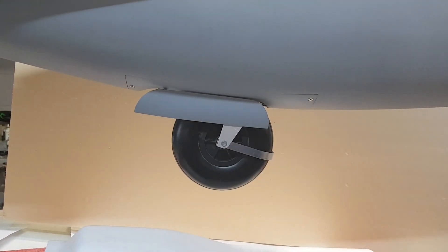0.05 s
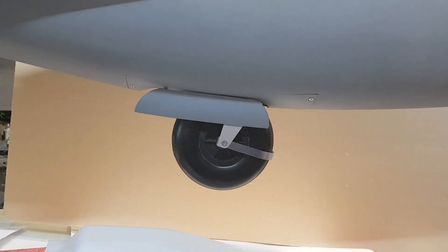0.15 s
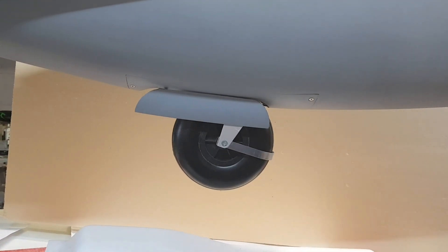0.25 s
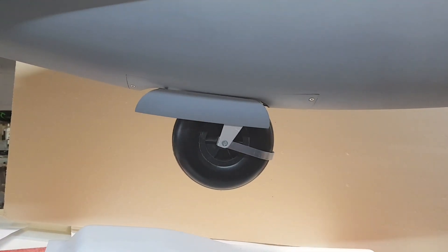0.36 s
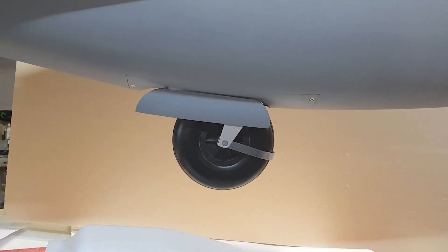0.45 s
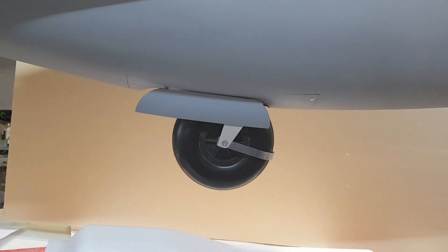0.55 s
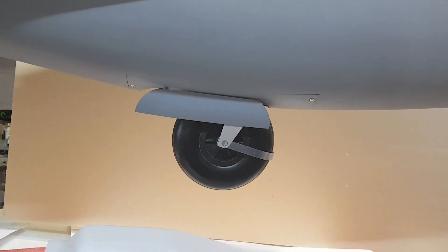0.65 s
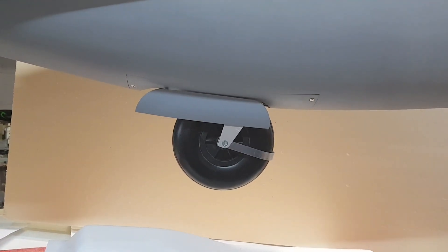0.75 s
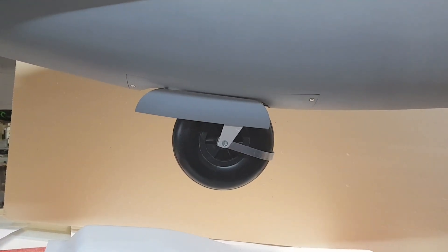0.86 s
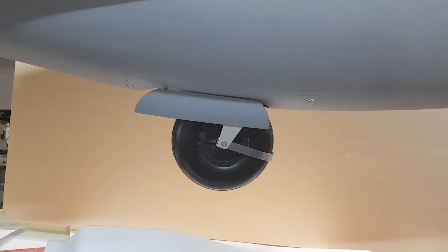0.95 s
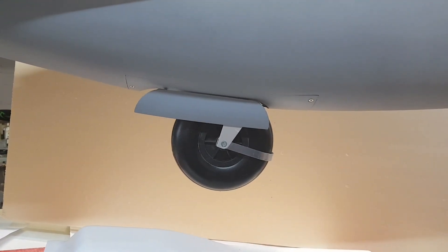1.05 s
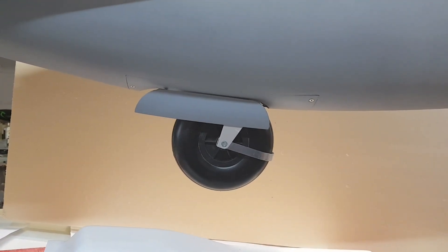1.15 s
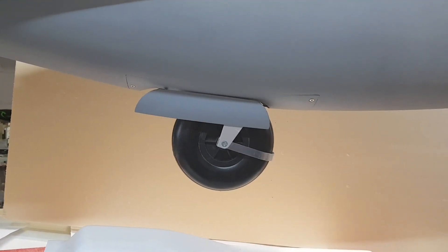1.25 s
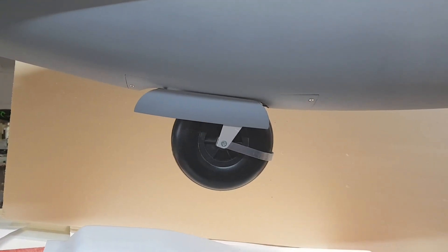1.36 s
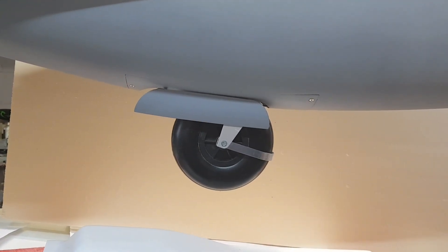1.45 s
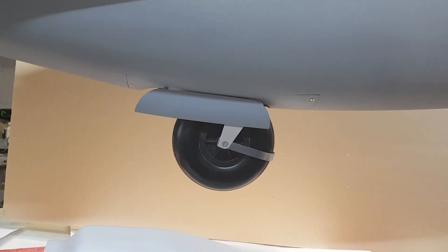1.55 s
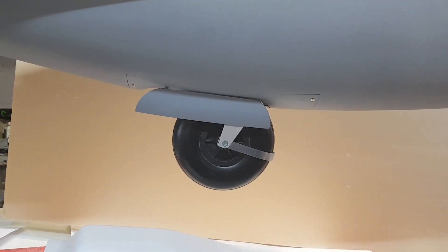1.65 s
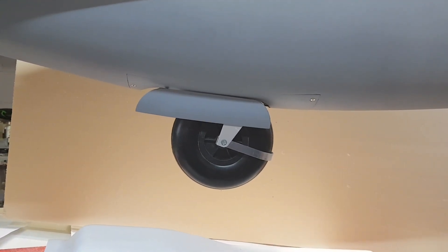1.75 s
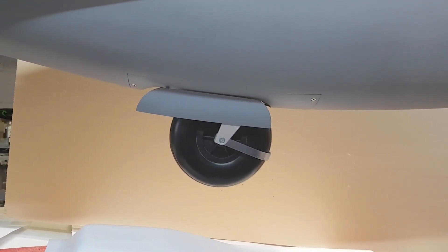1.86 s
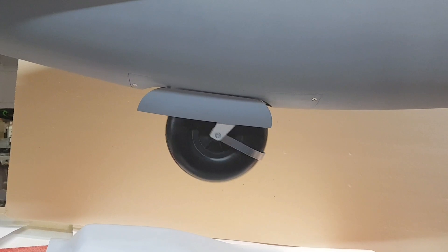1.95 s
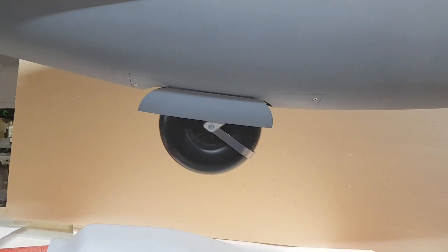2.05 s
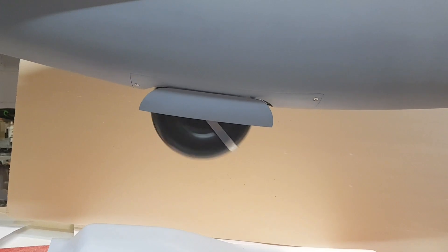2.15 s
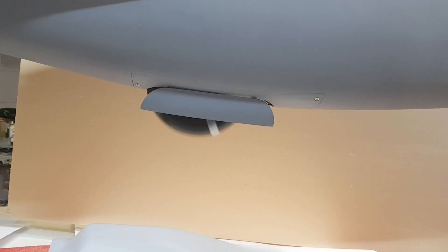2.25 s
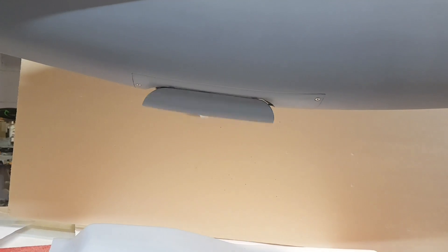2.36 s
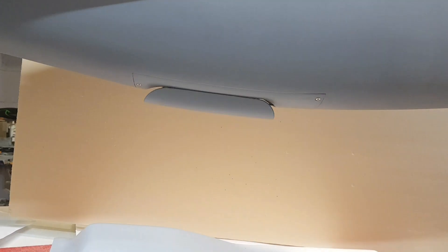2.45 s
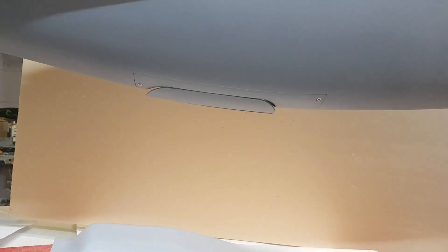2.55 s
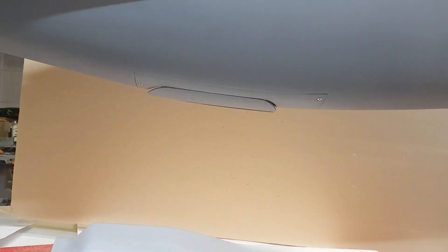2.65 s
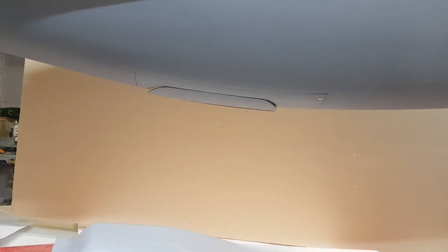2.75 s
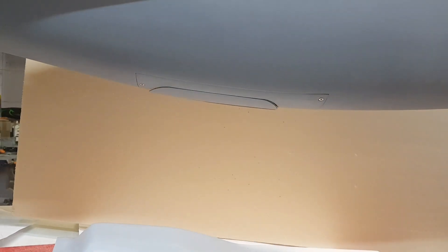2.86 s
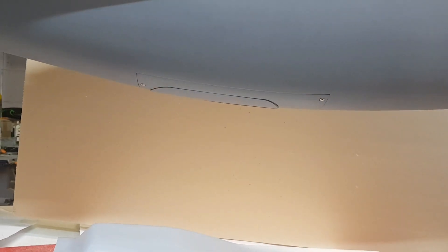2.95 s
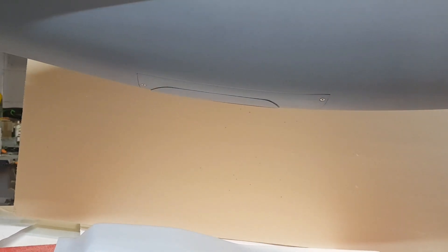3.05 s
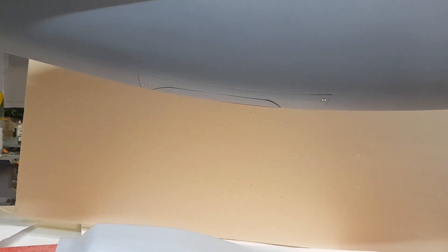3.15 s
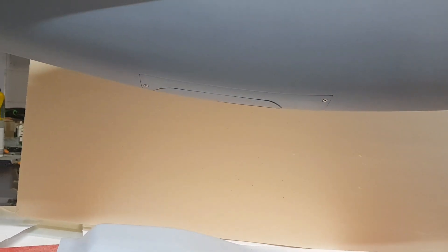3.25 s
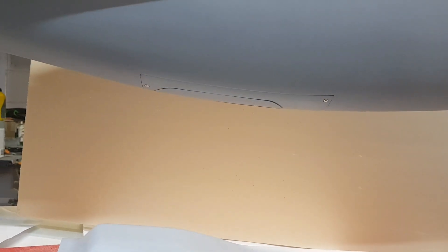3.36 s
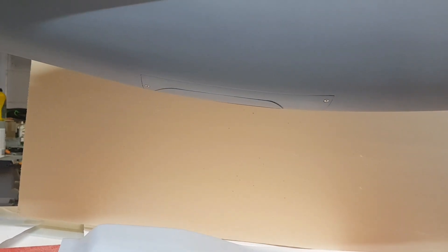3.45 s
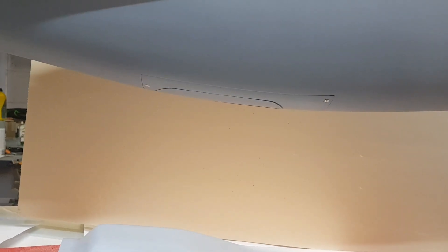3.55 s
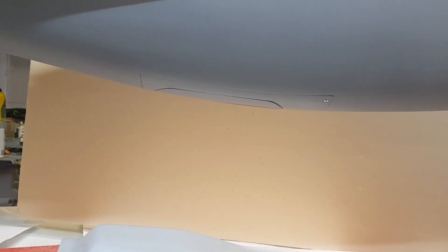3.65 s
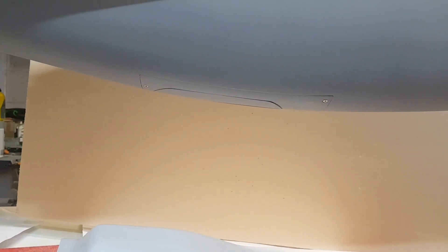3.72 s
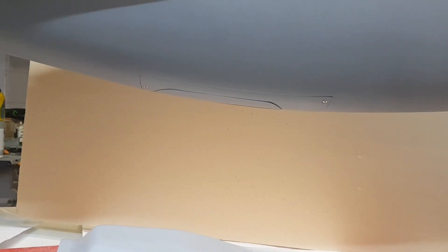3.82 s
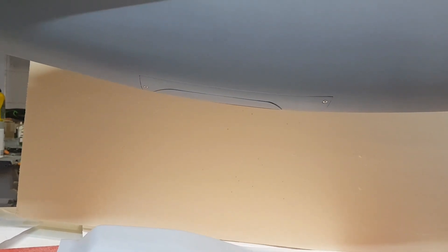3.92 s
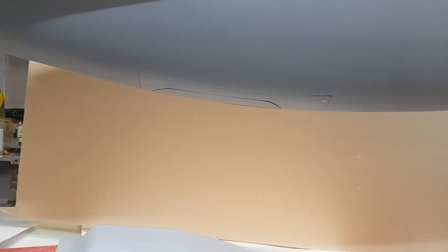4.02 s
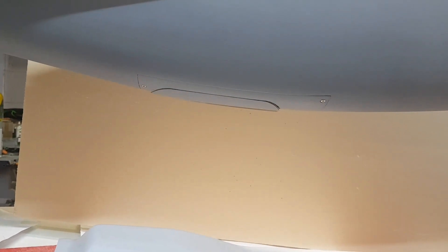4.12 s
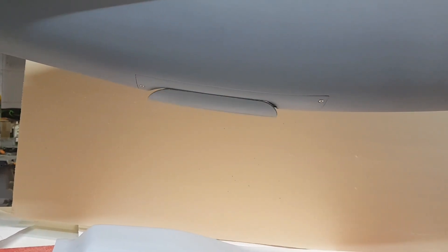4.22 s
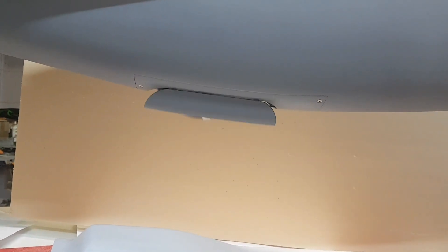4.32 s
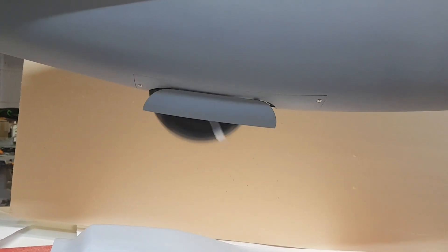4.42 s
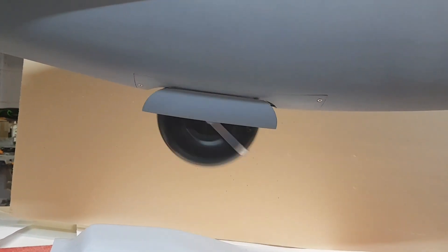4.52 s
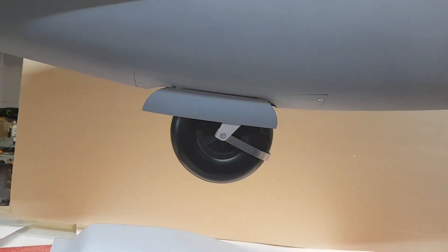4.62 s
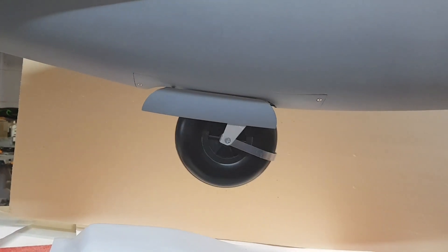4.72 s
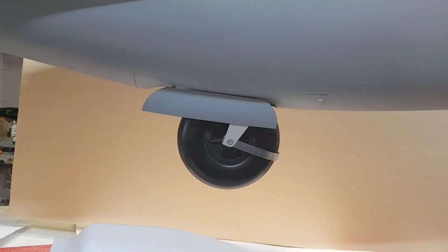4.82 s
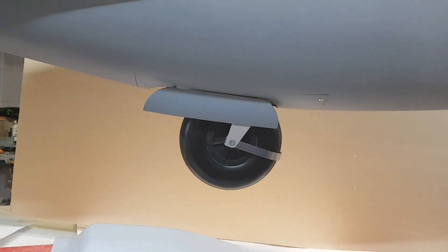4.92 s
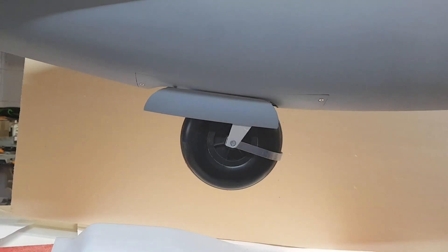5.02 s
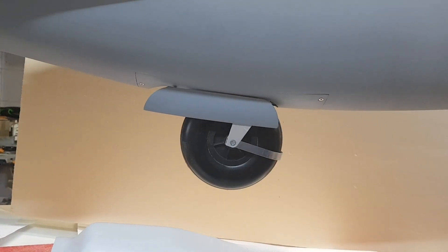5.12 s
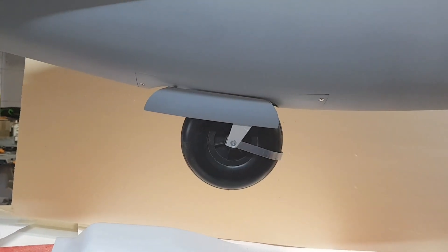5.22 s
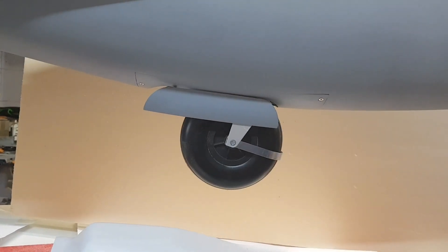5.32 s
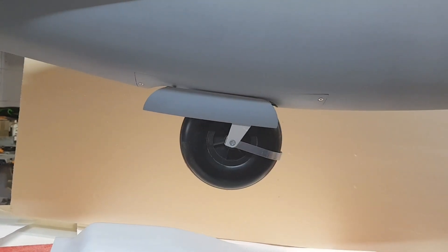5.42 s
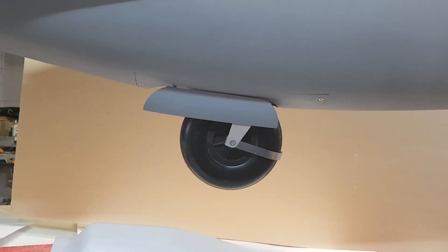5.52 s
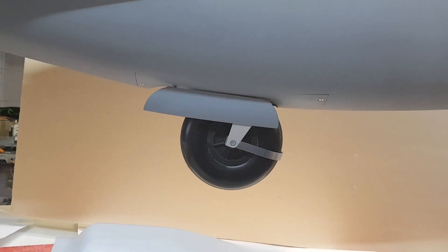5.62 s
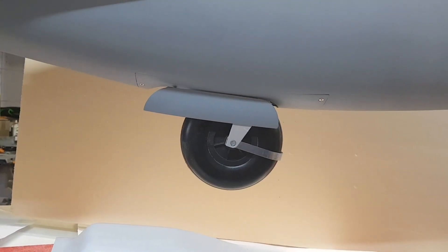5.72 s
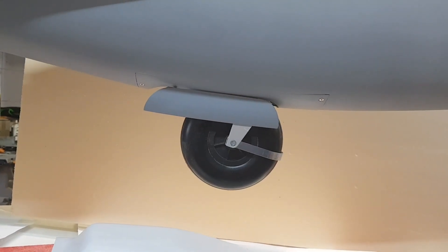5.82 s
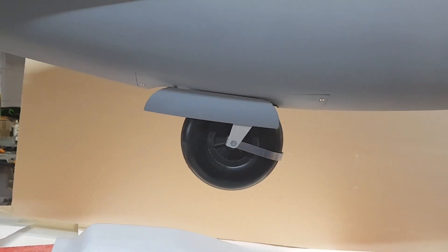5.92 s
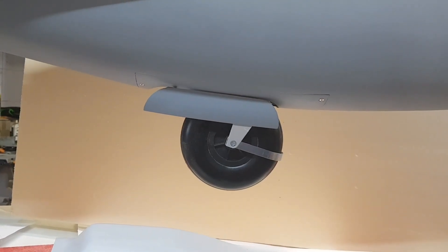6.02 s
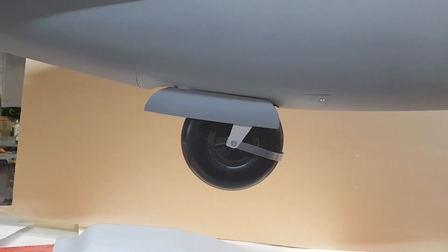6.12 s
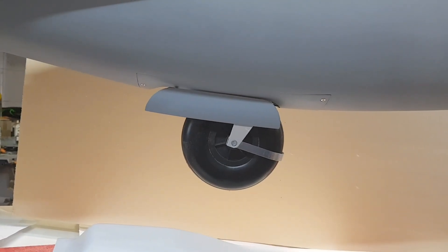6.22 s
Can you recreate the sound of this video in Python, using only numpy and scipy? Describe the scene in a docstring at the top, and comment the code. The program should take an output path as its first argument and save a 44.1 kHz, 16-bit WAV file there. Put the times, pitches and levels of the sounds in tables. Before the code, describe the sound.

Close on a workbench, a tiny geared motor buzzes twice in rising and falling whirrs, knocking against its stops over faint mains hum.

```python
"""Model landing gear on a workbench

A small servo on the left of the microphone retracts and lowers the landing gear of a model aircraft.
Tooth strikes and sliding noise ring the hollow fuselage, gearbox and motor: a whirr that rises with speed.
Lone teeth tick, the motor twitches in short spurts, the linkage binds, the gears squeal in gliding tones,
and leg and door knock against their stops as clicks with rattle. Sine tones make the drive's faint whine
and the mains hum, filtered noise the workshop; the right side is shaded and hears mostly reflections."""
import sys
import numpy as np
from scipy import signal
from scipy.fft import rfft, irfft, next_fast_len
from scipy.io import wavfile
from scipy.ndimage import uniform_filter1d

SR = 44100
rng = np.random.default_rng(int(sys.argv[2]) if len(sys.argv) > 2 else 0)


def generate_wav(signal):
    """Clip the signal to [-1, 1] and save it as 16-bit WAV at the path in sys.argv[1]."""
    frames = np.transpose(np.atleast_2d(signal))
    scaled = np.clip(frames, -1, 1) * 32767
    pcm = np.round(scaled).astype(np.int16)
    wavfile.write(sys.argv[1], SR, pcm)


N = 276929
TIME = np.arange(N) / SR


def from_db(db):
    """Decibels to amplitude gain."""
    return 10 ** (np.asarray(db) / 20)


def rms_one(x):
    """Scale to unit power."""
    return x / np.sqrt(np.mean(x ** 2) + 1e-20)


def at_hz(points, hz):
    """Read a spectrum on a log-frequency axis."""
    f, value = np.transpose(points)
    return np.interp(np.log(hz + 1), np.log(f), value)


def drift(rate_hz):
    """Slow random wandering with a spread of 1: noise low-passed near the given rate."""
    size = next_fast_len(N, True)
    hz = np.arange(size // 2 + 1) * SR / size
    spectrum = rfft(rng.standard_normal(size)) / (1 + (hz / rate_hz) ** 2)
    return rms_one(irfft(spectrum, size)[:N])


def colour(x, spectrum, size=8192):
    """Causal (minimum-phase) filter with the given spectrum, made by folding its cepstrum."""
    hz = np.arange(size // 2 + 1) * SR / size
    cepstrum = irfft(np.log(from_db(at_hz(spectrum, hz))))
    cepstrum[1:size // 2] *= 2
    cepstrum[size // 2 + 1:] = 0
    impulse_response = irfft(np.exp(rfft(cepstrum)))
    return signal.fftconvolve(x, impulse_response)[:N]


def resonate(x, modes):
    """Parallel two-pole resonances of alternating sign."""
    out = 0
    for k, (hz, width_hz, db) in enumerate(modes):
        r = np.exp(-np.pi * width_hz / SR)
        poles = [1, -2 * r * np.cos(2 * np.pi * hz / SR), r * r]
        gain = (-1) ** k * from_db(db) * (1 - r * r) / 2
        out = out + gain * signal.lfilter([1, 0, -1], poles, x + 1e-18)
    return out


def band(x, low_hz, high_hz):
    """Band-pass with steep edges."""
    return signal.sosfilt(signal.butter(3, [low_hz, high_hz], "band", fs=SR, output="sos"), x)


def even(x, seconds=0.021):
    """Hold the running power at one."""
    size = max(int(seconds * SR), 2)
    power = uniform_filter1d(uniform_filter1d(x * x, size), size)
    return x / np.sqrt(np.abs(power) + 1e-12)


def burst(t60_s, size=16384):
    """Dying noise of unit energy, 60 dB down after t60_s."""
    decay = np.exp(-np.log(1000) * np.arange(size) / (t60_s * SR))
    tail = rng.standard_normal(size) * decay
    return tail / np.sqrt(np.sum(tail ** 2))


def clicks_at(times, gains):
    """Single-sample impulses."""
    samples = np.round(np.asarray(times) * SR).astype(int)
    return np.bincount(np.clip(samples, 0, N - 1), gains, N)


def swell(peak_s, length_s):
    """A rounded peak with long tails, above half its height for length_s."""
    distance = 2 * np.arccosh(2) * np.abs(TIME - peak_s) / length_s
    return 1 / np.cosh(np.minimum(distance, 20))


# workshop air, relative spectrum: (frequency [Hz], density [dB per Hz])
WORKSHOP_SPECTRUM = [(25, -15.5), (45, -5.5), (62, 2.5), (85, 6.5), (130, -2), (185, -0.5), (230, -7),
                     (290, -1), (380, -13.5), (650, -23), (1000, -24.5), (1600, -20), (2800, -23.5),
                     (4300, -39), (6700, -35), (9000, -51), (12000, -37.5), (16000, -40.5)]
# left-right likeness of that air at the microphone: (frequency [Hz], likeness [0 to 1])
SIDE_LIKENESS = [(60, 1), (290, 0.95), (640, .35), (1400, .05)]


def workshop(noise_db=-43):
    """Dull room noise: its long waves reach both sides alike, its short waves separately."""
    size = next_fast_len(N)
    shared, own = rfft(rng.standard_normal((2, size)))
    alike = np.clip(at_hz(SIDE_LIKENESS, np.arange(len(shared)) * SR / size), 0, 1)
    right = alike * shared + np.sqrt(1 - alike ** 2) * own
    noises = [colour(irfft(side, size)[:N], WORKSHOP_SPECTRUM) for side in (shared, right)]
    return from_db(noise_db) * np.array([rms_one(noise) for noise in noises])


def hum(hz=99.7, left_db=-35.4, waver=0.15, sway_rad=0.15):
    """The mains hum: one low tone wavering in strength and phase."""
    strength = from_db(left_db) * (1 + waver * drift(5.4))
    return np.sqrt(2) * strength * np.sin(2 * np.pi * hz * TIME + sway_rad * drift(2.5))


# the drive holds a load: (start [s], end [s], whine added on the left [dB])
LOAD_HOLDS = [(-.1, 0.435, -64), (0.531, 1.434, -61.5), (1.454, 2.602, -70), (3.95, 5.371, -70.5),
              (6.114, 6.398, -69)]


def whine(hz=8363, idle_db=-77, ramp_s=0.066, sway_rad=0.35):
    """The switching drive sings one high tone, stronger while the servo holds its load."""
    gain = np.full(N, from_db(idle_db))
    for start, end, db in LOAD_HOLDS:
        inside_s = np.minimum(TIME - start, end - TIME)
        gain += from_db(db) * np.clip(inside_s / ramp_s + .5, 0, 1)
    return np.sqrt(2) * gain * np.sin(2 * np.pi * hz * TIME + sway_rad * drift(18))


# the four moves of the gear train: (time [s], mesh rate before spurts and the slow limit [teeth per s])
SETTLE_MOVE = [(0, 633), (.15, 310), (.2, 197), (.39, 99), (.48, 14)]
RETRACT_MOVE = [(1.465, 30), (1.53, 79), (1.58, 512), (1.86, 463), (2.0, 685), (2.15, 796), (2.4, 680),
                (2.579, 430), (2.68, 75), (2.79, 18.5)]
LOWER_MOVE = [(3.91, 26.5), (4.0, 117), (4.08, 492), (4.3, 708), (4.5, 790), (4.73, 770), (4.88, 500),
              (4.94, 140), (5.179, 115), (5.469, 15)]
RESTART_MOVE = [(6.001, 34), (6.12, 65), (6.28, 170)]
# level at each speed, before spurts and binds:
# (mesh rate [teeth per s], shell rumble [dB], gear chatter [dB], motor whirr [dB], brush fizz [dB])
SPEED_LOUDNESS = [(15, -92, -69, -99, -89), (60.62, -59.5, -49, -67.5, -70),
                  (120, -53.5, -41.5, -49, -66.5), (489, -47, -37.5, -43, -60),
                  (836.9, -36, -27, -29.5, -36.5)]
# the motor starts or corrects its position: (peak [s], length [s], level [dB])
MOTOR_SPURTS = [(0.082, 0.069, -33), (0.132, 0.043, -35), (1.54, 0.039, -41), (2.854, 0.046, -51),
                (3.024, 0.052, -57.5), (3.17, 0.093, -57), (3.25, 0.063, -53), (3.505, 0.056, -49),
                (3.735, 0.16, -66), (4.039, 0.038, -35.5), (5.026, 0.051, -35), (6.175, 0.046, -49.5)]
# balance of a spurt, against its level: shell [dB], gears [dB], motor [dB], fizz [dB]
SPURT_BALANCE = [-11.5, 1.5, 0.5, -17]
# the linkage binds and grinds: (peak [s], length [s], added shell rumble [dB], added gear chatter [dB])
LINKAGE_BINDS = [(0.083, 0.025, -39, -40), (0.215, 0.045, -62, -43.5), (0.338, 0.11, -47, -33.5),
                 (1.582, .035, -35.5, -29), (1.702, 0.026, -33, -57), (1.796, 0.035, -48, -39),
                 (2.152, 0.21, -40, -39), (2.29, 0.052, -33, -25.5), (2.406, 0.071, -34.5, -27.5),
                 (2.486, 0.089, -36, -53), (2.649, 0.077, -42.5, -83), (2.894, 0.19, -51.5, -52.5),
                 (3.246, 0.058, -41.5, -42), (3.569, 0.11, -50, -48.5), (3.97, .05, -45.5, -45),
                 (4.085, 0.03, -33.5, -53), (4.186, 0.039, -36, -38), (4.269, .025, -37.5, -49),
                 (4.42, 0.054, -26, -34), (4.647, 0.036, -33.5, -24.5), (4.709, 0.067, -29.5, -47),
                 (4.978, 0.05, -43, -34), (5.07, 0.027, -41.5, -46), (6.241, .04, -41, -42)]


def motion(spurt_rate=540, spurt_at_db=-34, spurt_db_per_doubling=13, bind_fizz_share=0.3):
    """Mesh rate [teeth per s] and gains of shell, gears, motor and fizz; spurts and binds add power."""
    moves = (SETTLE_MOVE, RETRACT_MOVE, LOWER_MOVE, RESTART_MOVE)
    speed = sum(np.interp(TIME, *np.transpose(move), left=0, right=0) for move in moves)
    speed = np.maximum(speed, 10)
    speeds, *levels = np.transpose(SPEED_LOUDNESS)
    power = from_db([np.interp(np.log(speed), np.log(speeds), db) for db in levels]) ** 2

    push = sum((from_db(db) * swell(s, length)) ** 2 for s, length, db in MOTOR_SPURTS)
    power += np.outer(from_db(SPURT_BALANCE) ** 2, push)
    # a harder spurt turns faster
    doublings = (10 * np.log10(push) - spurt_at_db) / spurt_db_per_doubling
    speed = np.maximum(speed, spurt_rate * 2 ** doublings)

    free_rumble = power[0].copy()
    for s, length, shell_db, gear_db in LINKAGE_BINDS:
        power[:2] += np.outer(from_db([shell_db, gear_db]) ** 2, swell(s, length) ** 2)
    # the brushes spark more as the motor labours against a bind
    power[3] *= (power[0] / free_rumble) ** bind_fizz_share
    return speed, np.sqrt(power)


# resonances of fuselage, gearbox and motor can: (frequency [Hz], width [Hz], relative level [dB])
SHELL_MODES = [(295, 27, -2), (457.5, 28, -1.5), (662, 90, 1), (987, 126, -3.5)]
GEARBOX_MODES = [(1119, 74, 5.5), (1390, 129, -1), (1653, 46, 2), (2110, 270, 0), (2319, 257, -2),
                 (2631, 80, 0), (2697, 400, -8), (3330, 79, -11.5)]
MOTOR_MODES = [(4180, 840, -1.5), (4678, 360, 3.5), (4887, 420, 1), (5917, 270, -2.5), (6114, 310, -6.5),
               (6750, 790, -19.5)]
# what a soft tooth tick rings with: (frequency [Hz], width [Hz], relative level [dB])
TOOTH_MODES = [(1225, 236, 4.5), (1403, 340, 3), (1675, 39, 3.5), (1940, 83, -8.5), (2560, 1500, -17.5),
               (5200, 780, -39)]
# brush fizz, relative spectrum: (frequency [Hz], filter gain [dB])
FIZZ_SPECTRUM = [(3000, -53), (6500, 8.5), (7500, -3), (9000, -12.5), (11000, -8.5), (13000, -8.5),
                 (16000, -13.5)]


def servo(speed, gains, uneven_db=7.0, shell_rub=2.2, gear_rub=1.0, motor_rub=0.98,
          flutter_db=1.5, slide_s=0.0061, slowest=45):
    """Each tooth strikes, then slides; the pulses ring the shell, the gearbox and the motor can. Two sides."""
    # backlash makes the wheels hunt around their mean speed
    rate = np.maximum(speed, slowest) * (1 + .03 * drift(60))
    turns = np.cumsum(rate) / SR   # one turn per tooth
    times = np.interp(np.arange(1, int(turns[-1])), turns, TIME)
    strengths = from_db(uneven_db * rng.standard_normal(N)[:len(times)])
    strikes = even(clicks_at(times, strengths))
    # sliding friction is strongest just after each strike; each side faces other wheels
    contact = np.exp(-(turns % 1) / (rate * slide_s))
    slide = even(contact * rng.standard_normal((2, N)))

    shell = even(band(resonate(strikes + shell_rub * slide, SHELL_MODES), 190, 1900))
    # slow teeth land softly and ring mostly the lowest gearbox modes
    fast = np.clip(rate / 420, .35, 1)
    mesh = strikes + gear_rub * slide
    hard_mesh = even(resonate(mesh, GEARBOX_MODES))
    soft_mesh = even(resonate(mesh, TOOTH_MODES))
    gears = even(band(fast * hard_mesh + (1 - fast) * soft_mesh, 1100, 4050))
    motor = even(band(resonate(fast * strikes + motor_rub * slide, MOTOR_MODES), 3050, 7200))
    fizz = even(np.array([colour(side, FIZZ_SPECTRUM) for side in slide]))
    whirr = sum(gain * layer for gain, layer in zip(gains, (shell, gears, motor, fizz)))
    return whirr * from_db(flutter_db * drift(25))


def gear_whine(speed, chatter, whirr, second_db=-13.0, third_db=-15, rasp_db=-9, patchy_db=9, onset=500):
    """Fast mesh sings partials 2, 3 and 7 of the tooth rate, each flaring and fading irregularly."""
    rate = speed * (1 + .025 * drift(90) + .04 * drift(10))
    phase = 2 * np.pi * np.cumsum(rate) / SR
    low = chatter * from_db(second_db + patchy_db * np.tanh(drift(30)))
    middle = chatter * from_db(third_db + patchy_db * np.tanh(drift(30)))
    high = whirr * from_db(rasp_db + patchy_db * np.tanh(drift(30)))
    tones = low * np.sin(2 * phase) + middle * np.sin(3 * phase) + high * np.sin(7 * phase)
    fade_in = np.clip((speed - onset) / 200, 0, 1)   # teeth per s
    return np.sqrt(2) * fade_in * tones


# the fast gears squeal briefly, before pitch and level waver:
# (start [s], length [s], start pitch [Hz], end pitch [Hz], level [dB])
SQUEALS = [(0.06, 0.025, 4500, 4700, -36), (0.077, 0.032, 5940, 6040, -36.5),
           (4.498, 0.025, 5100, 5146, -24.5), (4.535, .033, 5180, 4797, -24.5),
           (4.595, 0.032, 5650, 5633, -33), (4.607, 0.059, 1200, 1400, -21.5),
           (4.732, 0.026, 5350, 5000, -27)]


def squeals(waver=0.027, unsteady_db=1.5):
    """The fast gears squeal briefly in unsteady, gliding tones."""
    out = np.zeros(N)
    unsteady = 1 + waver * drift(200)
    for s, length, start_hz, end_hz, db in SQUEALS:
        progress = np.clip((TIME - s) / length, 0, 1)
        hz = (start_hz + (end_hz - start_hz) * progress) * unsteady
        envelope = np.sqrt(2 * np.abs(np.sin(np.pi * progress)))
        out += from_db(db) * envelope * np.sin(2 * np.pi * np.cumsum(hz) / SR)
    return out * from_db(unsteady_db * drift(250))


# single teeth drop into mesh as the servo creeps: (time [s], relative level [dB])
TOOTH_TICKS = [(0.307, -21), (0.3393, -24), (0.3643, -22), (.377, -16), (0.391, -23), (.43, -18),
               (4.9968, -22), (5.356, -33), (5.4082, -34)]


def teeth(level_db=28, top_hz=6500):
    """Lone tooth ticks ring the gearbox."""
    s, db = np.transpose(TOOTH_TICKS)
    return band(resonate(clicks_at(s, from_db(db + level_db)), TOOTH_MODES), 500, top_hz)


def pip(db=1):
    """One tiny dry tick, on the right only, with a faint low knock under it."""
    tick = resonate(clicks_at([1.1938], [from_db(db)]), [(3900, 800, 0), (700, 2500, -11)])
    return band(band(tick, 150, 5000), 150, 5000)


# leg, door and linkage knock:
# (time [s], relative level [dB], lowest and highest frequency that the contact excites [Hz])
STOP_KNOCKS = [(1.4707, -36.5, 700, 2500), (1.5549, -8.5, 1199, 1330), (1.562, -14.5, 1388, 4600),
               (2.2191, -14.5, 1800, 3000), (2.2274, -11, 1800, 3500), (2.2354, -1.5, 1800, 9000),
               (2.2392, -18, 900, 5000), (2.2511, -7.5, 300, 13000), (2.26, -8, 350, 700),
               (2.4618, -27, 400, 12010), (2.572, -34, 2977, 14000), (2.8106, -41.5, 700, 2500),
               (2.9094, -34, 600, 2400), (3.1095, -34, 500, 14000), (3.9229, -38, 700, 2600),
               (4.126, -24.5, 900, 4500), (4.56, 0, 1600, 8100), (4.5657, -5.5, 400, 1400),
               (4.57, -4, 130, 330), (4.581, -11, 200, 11160), (4.6802, -11, 400, 3000),
               (4.688, -16, 200, 7000), (6.0284, -31.5, 700, 1400), (6.0897, -30, 896, 2577)]
# what a knock rings with: (frequency [Hz], width [Hz], relative level [dB])
FRAME_MODES = [(222, 89, 10), (278, 12, 20.5), (445, 55, 11.5), (708, 43, -15.5), (988, 279, 10),
               (1110, 249, -15), (1400, 200, -8), (1890, 100, -24), (2170, 160, -13), (2469, 58, 16.5),
               (2880, 41, 4), (3330, 330, 6), (4210, 190, 3), (4470, 160, 8.5), (7060, 260, -1)]
# crack of the contact, relative spectrum: (frequency [Hz], filter gain [dB])
CRACK_SPECTRUM = [(100, -52), (250, -1.5), (650, 15), (1500, 15), (3300, 11.5), (5500, -4.5), (8500, -8.5),
                  (13000, 2), (16000, 8)]


def knocks(ring_db=20, crack_db=15, crack_t60_s=0.058, rattle=1.0, rattle_t60_s=0.042):
    """Each blow is a click with a short rattle, limited in band by its contact; the frame rings and cracks."""
    hits = np.zeros((2, 2, N))   # blow or crack, side, sample
    for s, db, low_hz, high_hz in STOP_KNOCKS:
        force = rattle * np.array([burst(rattle_t60_s), burst(rattle_t60_s)])
        force[:, 0] += 1
        crack = np.array([burst(crack_t60_s), burst(crack_t60_s)])
        contact = np.vstack([signal.butter(1, low_hz, "high", fs=SR, output="sos"),
                             signal.butter(2, min(high_hz, .45 * SR), fs=SR, output="sos")])
        start = int(s * SR)
        hit = from_db(db) * signal.sosfilt(contact, np.array([force, crack]))[..., :N - start]
        hits[..., start:start + hit.shape[-1]] += hit
    blows, cracks = hits
    ringing = resonate(blows, FRAME_MODES)
    cracking = np.array([colour(side, CRACK_SPECTRUM) for side in cracks])
    return from_db(ring_db) * ringing + from_db(crack_db) * cracking


# bands of a faint hiss: (frequency [Hz], width [Hz], relative level [dB])
HISS_BANDS = [(3130, 200, -0.5), (4140, 700, -11)]


def hiss(level_db=-62, peak_s=6.11, length_s=0.8):
    """A faint narrow hiss swells around the last move: noise through two resonances."""
    noise = rms_one(resonate(rng.standard_normal(N), HISS_BANDS))
    return from_db(level_db) * swell(peak_s, length_s) * noise


def spread(x, hull, hull_t60_s=0.04, room_db=-15, room_t60_s=0.36):
    """One side's sound: direct, plus quick reflections from hull and bench, plus the room."""
    # the small surfaces reflect only the shorter waves
    quick = band(burst(hull_t60_s), 700, 17000)
    reflections = hull * quick + from_db(room_db) * burst(room_t60_s)
    echoes = signal.fftconvolve(x, reflections)[:N]
    return (x + echoes) / np.sqrt(1 + hull ** 2)


# level of the right side of the microphone: (frequency [Hz], gain [dB])
RIGHT_SHADE = [(100, -5.5), (380, -1), (700, -3.5), (1290, -7.5), (2400, -14), (4400, -10.5), (8100, -5.5),
               (15000, -0.5)]


def scene(wrap_hz=800):
    """The mechanism is on the left; the right side hears it shaded and mostly by reflection."""
    speed, gains = motion()
    train = servo(speed, gains) + gear_whine(speed, chatter=gains[1], whirr=gains[2])
    near, far = train + squeals() + teeth() + knocks() + hiss()
    left = spread(near, hull=0.63)
    # long waves wrap around the microphone and reach both sides alike
    wrapped = signal.sosfilt(signal.butter(1, wrap_hz, fs=SR, output="sos"), left)
    shaded = signal.sosfilt(signal.butter(2, wrap_hz, "high", fs=SR, output="sos"), spread(far, hull=2.0))
    left, right = np.array([left, wrapped + shaded]) + workshop()
    right = colour(right, RIGHT_SHADE) + pip()
    # both tones are slightly weaker on the right
    tones = whine() * from_db([[0], [-2.8]]) + hum() * from_db([[0], [-1.8]])
    return np.array([left, right]) + tones


def record(dry, stop_hz=16500):
    """Peaks beyond full scale overload flat; a steep filter cuts the top, 70 dB down from stop_hz."""
    steep = signal.cheby2(16, 70, stop_hz, fs=SR, output="sos")
    return signal.sosfilt(steep, np.clip(dry, -1, 1))


dry = scene()
out = record(dry)
generate_wav(out)
```